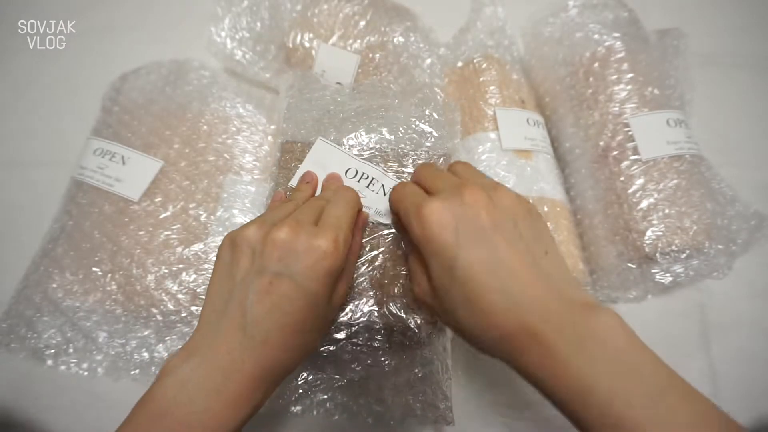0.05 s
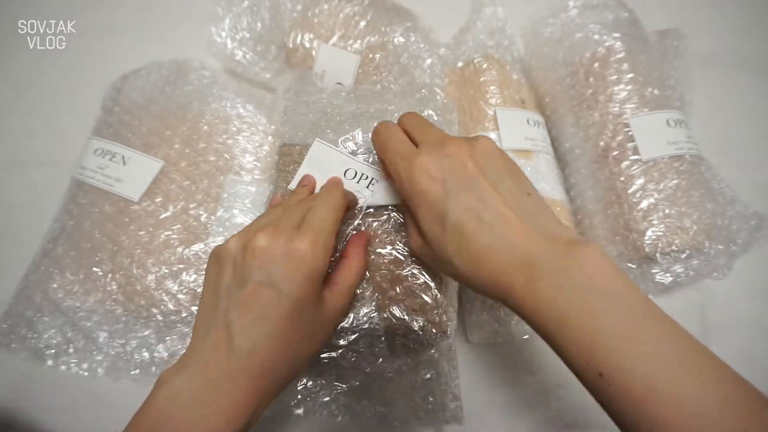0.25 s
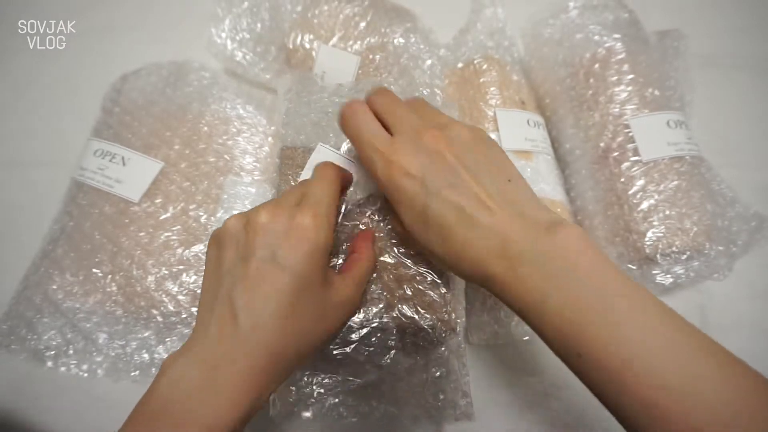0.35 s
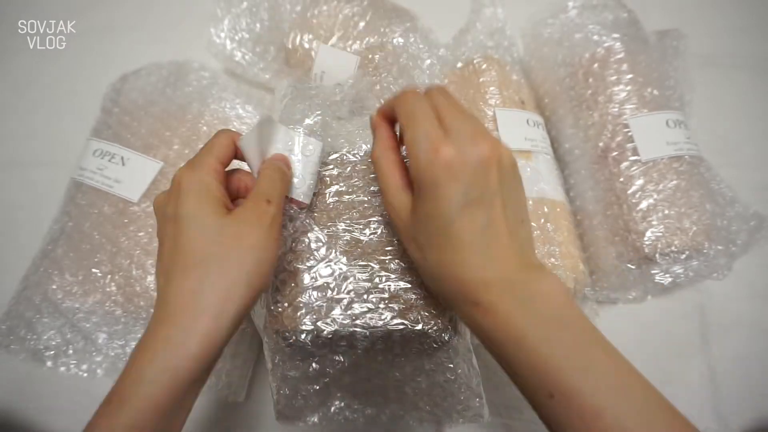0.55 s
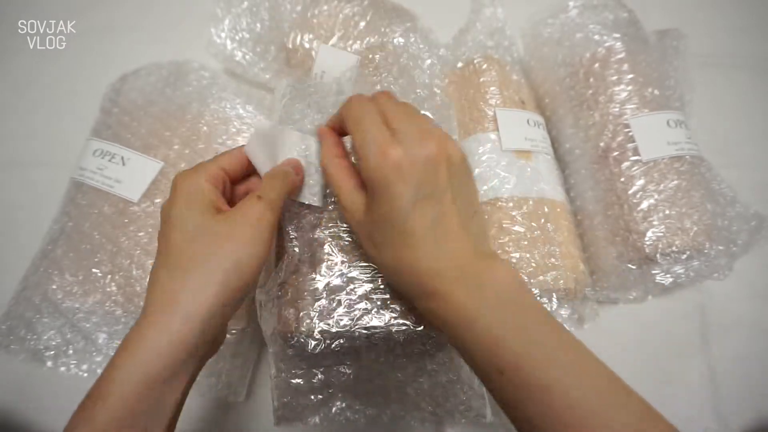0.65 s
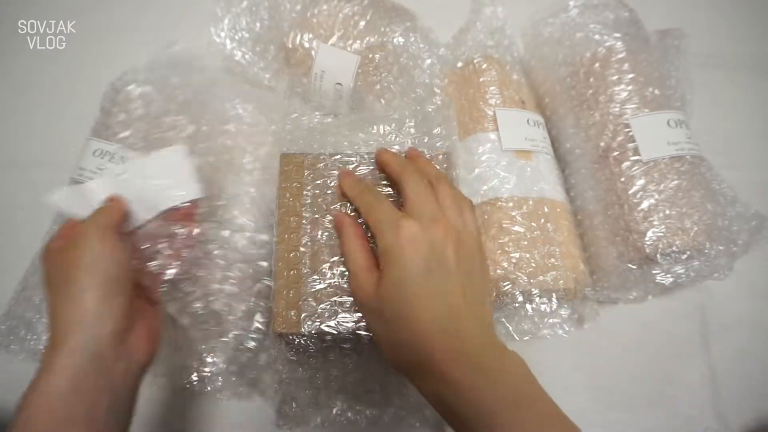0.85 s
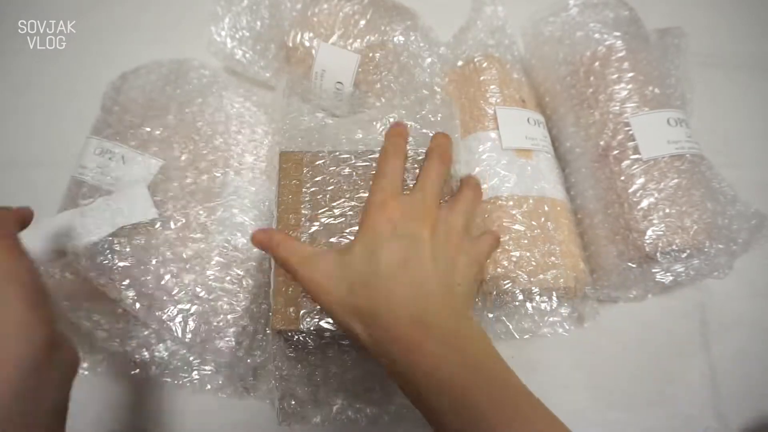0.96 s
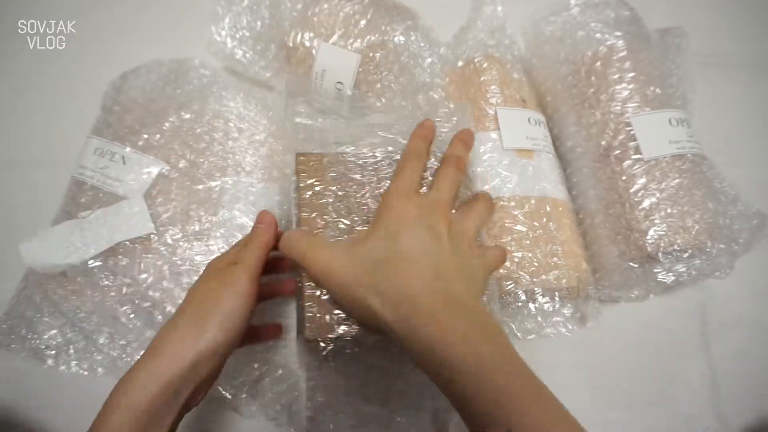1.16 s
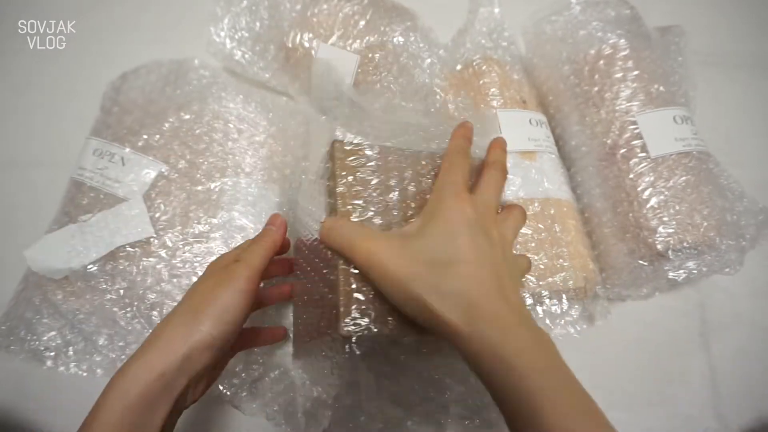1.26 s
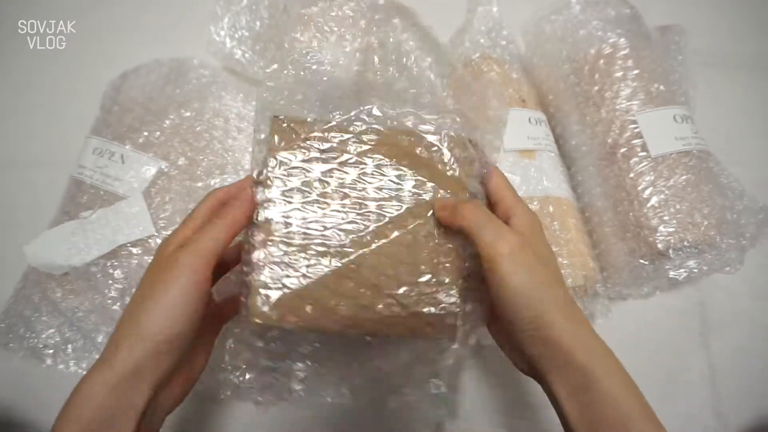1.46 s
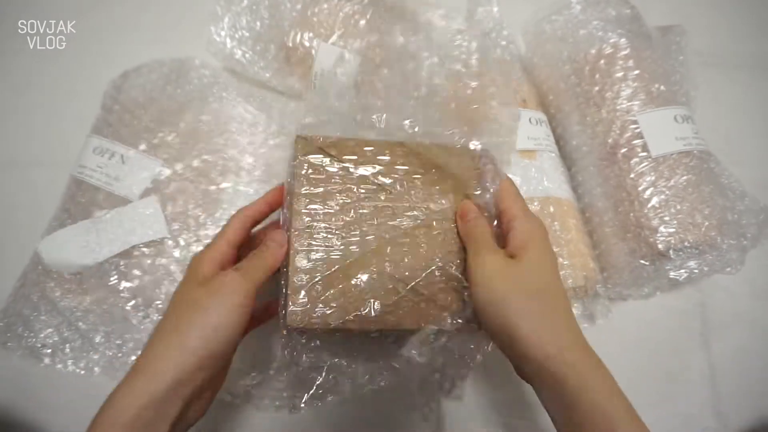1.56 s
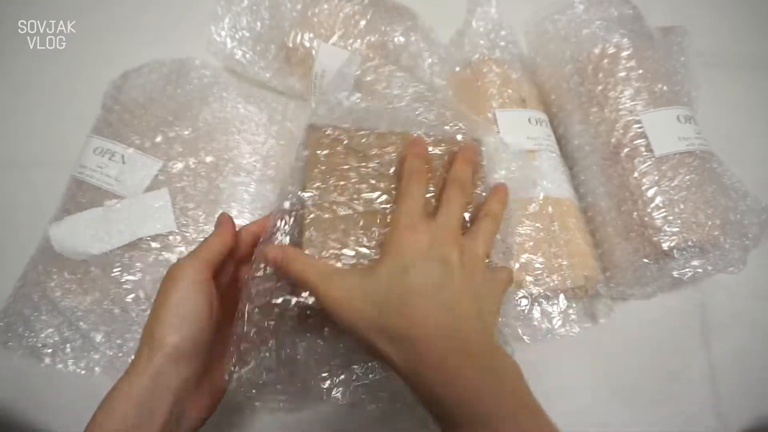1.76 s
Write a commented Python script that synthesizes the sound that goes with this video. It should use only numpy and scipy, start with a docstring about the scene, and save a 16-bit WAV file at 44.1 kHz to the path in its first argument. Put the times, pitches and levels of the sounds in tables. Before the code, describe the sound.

Bubble wrap crackles under the hands, close up in a small room. From about 0.2 seconds a sticky label lets go in sharp snaps, ending in a short rip near 0.4 seconds, the loudest moment. Softer, fizzy rustling follows as the wrap is unfolded. From 1.3 to 1.8 seconds the crinkling grows fuller, with small hollow pocks from the air cells as the box inside is lifted.

```python
"""At a table in a small room, hands rip a sticky label off a bubble-wrapped packet, then unfold the wrap
and lift the box inside. The glue lets go in sharp snaps and one short rip; the film rustles in countless
tiny buckles, and the air cells give hollow pocks under the fingers. The stereo microphone is close."""
import sys
import numpy as np
from scipy import signal
from scipy.fft import rfft, irfft
from scipy.io import wavfile
from scipy.ndimage import uniform_filter1d

SR = 44100
rng = np.random.default_rng(int(sys.argv[2]) if len(sys.argv) > 2 else 0)


def transcribe(signal):
    """Save signal, clipped to [-1, 1], as a 16-bit WAV file at the path in sys.argv[1]."""
    frames = np.atleast_2d(signal).T
    limited = np.clip(frames, -1, 1)
    pcm = np.round(limited * 32767).astype(np.int16)
    wavfile.write(sys.argv[1], SR, pcm)


N = 79380


def amp(db):
    """Decibels to gain."""
    return 10 ** (np.asarray(db) / 20)


def unit_rms(x):
    """Scales to rms 1."""
    return x / np.sqrt(np.mean(x ** 2) + 1e-20)


def read(points, hz):
    """Reads a curve on a log-frequency axis."""
    f, value = np.transpose(points)
    return np.interp(np.log(hz + 1), np.log(f), value)


def add(mix, start, sound):
    """Mixes a stereo sound in at a time in seconds."""
    part = mix[:, max(round(start * SR), 0):][:, :sound.shape[1]]
    part += sound[:, :part.shape[1]]


def panned(x, pan_db):
    """Constant-power pan; positive is left."""
    left = amp(pan_db)
    return np.array([x * left, x]) * np.sqrt(2 / (1 + left ** 2))


def click(colour, tilt=0, size=2048):
    """The shortest causal click with this spectrum and energy 1; tilt slopes the treble in dB/octave."""
    hz = abs(np.fft.fftfreq(size, 1 / SR))
    octaves = np.log2(np.clip(hz, 2600, 13000) / 6000)
    log_gain = np.log(amp(read(colour, hz) + tilt * octaves))
    wave = np.fft.ifft(np.exp(np.conj(signal.hilbert(log_gain)))).real
    return wave / np.linalg.norm(wave)


def crackle(curve, colour, per_s, spread_db):
    """A swarm of tiny clicks of uneven size, scattered over the film, riding a level curve."""
    hits = rng.random(N) < per_s / SR
    sizes = amp(spread_db * np.minimum(rng.exponential(1, N), 4)) * rng.choice([-1, 1], N)
    envelope = amp(np.interp(np.arange(N) / SR, *np.transpose(curve), left=-120))
    pan_db = -2.5 + 7.5 * rng.standard_normal(N)
    train = panned(unit_rms(hits * sizes) * envelope, pan_db)
    return signal.fftconvolve(train, click(colour)[None])[:, :N]


def room_tone():
    """A faint, steady bed of noise."""
    # room tone spectrum: f/Hz, level/dB
    colour = [(30, -38), (110, -26), (220, -19.5), (330, -16), (450, 12.5), (1000, -10), (4000, -6),
              (16000, -3.5)]
    return signal.fftconvolve(rng.standard_normal(N), click(colour))[:N]


def room(x):
    """A small room: a short, dense tail, more alike left and right in the bass than in the top end."""
    # reverb time: f/Hz, t60/s
    t60 = [(200, 0.19), (1000, 0.22), (4000, 0.21), (9000, 0.19), (16000, 0.23)]
    # left-right likeness of the tail: f/Hz, correlation
    likeness = [(200, 0.83), (1000, 0.62), (2500, 1), (5000, 0.32), (16000, 0.28)]
    onset_s = .00067
    hz, t, (left, other) = signal.stft(rng.standard_normal((2, SR // 2)), SR, nperseg=256)
    same = np.clip(read(likeness, hz), 0, 1)[:, None]
    right = same * left + np.sqrt(1 - same ** 2) * other
    decay = np.exp(-np.log(1000) * t / read(t60, hz)[:, None])
    tail = signal.istft(np.array([left, right]) * decay, SR)[1]
    tail *= np.clip(np.arange(tail.shape[1]) / SR / onset_s - .5, 0, 1)
    return signal.fftconvolve(x, tail / np.linalg.norm(tail[0]), axes=1)[:, :N]


def table_scatter(x):
    """The table and the packets around smear every crack over a few milliseconds."""
    decay_s = .0039
    t = np.arange(1500) / SR
    taps = rng.standard_normal((2, len(t))) * np.sqrt(t) * np.exp(-t / decay_s)
    taps += taps.mean(0)  # pulls the reflections toward the centre
    return signal.fftconvolve(x, taps / np.linalg.norm(taps[0]), axes=1)[:, :N]


def drifting(reflect, x, count=3, swells_per_s=6.005):
    """The hands move, so their sound crossfades through several sets of reflections."""
    turn = swells_per_s * np.arange(N) / SR
    return sum(reflect(x * np.cos(np.pi * (turn + k / count))) for k in range(count)) * np.sqrt(2 / count)


def air_cell_pocks():
    """An air cell rings for a few uneven cycles; it is too small to radiate bass."""
    # cells pressed or knocked: t/s, level/dB, f/Hz
    pocks = [(.004, -41, 896), (.062, -48, 910), (.112, -41, 975), (.235, -43.5, 950), (.243, -43, 1040),
             (.286, -45.5, 1010), (.427, -32.5, 1096), (.473, -38.5, 1460), (0.9252, -50, 1460),
             (.956, -46.5, 830), (1.117, -43.5, 1240), (1.2925, -40, 1290), (1.31, -40, 1180),
             (1.3483, -33.5, 1200), (1.423, -38, 1350), (1.536, -38, 1130), (1.5465, -29.5, 880),
             (1.589, -34.5, 1000), (1.752, -45, 778)]
    decay_s, pitch_jitter, low_cut_hz = .00055, .18, 560
    out, t = np.zeros((2, N)), np.arange(1500) / SR
    envelope = (t / decay_s) ** 2 * np.exp(-t / decay_s)
    envelope /= envelope.max()
    for (start, db, hz), noise in zip(pocks, rng.standard_normal((len(pocks), len(t)))):
        wobble = pitch_jitter * unit_rms(uniform_filter1d(noise, size=16))
        cycles = np.cumsum(hz * (1 + wobble)) / SR
        add(out, start, panned(amp(db) * envelope * np.sin(2 * np.pi * cycles), 0))
    return signal.sosfilt(signal.butter(3, low_cut_hz, "high", fs=SR, output="sos"), out)


def wrap_rustle():
    """The film fizzes and crinkles while the air cells rub on fingers and box."""
    # handling envelopes: t/s, fizz level/dB, crinkle level/dB, rub level/dB
    handling = [(0, -46.5, -58, -47.5), (.12, -49, -55.5, -56.5), (.2, -47.5, -61.5, -63.5),
                (.34, -54, -77, -66), (.44, -96, -94, -56), (0.518, -48, -49.5, -60.5),
                (0.566, -54.5, -69.5, -74), (.6, -52.5, -46, -57.5), (0.614, -57, -68, -76),
                (.648, -62.5, -57, -80), (0.676, -62, -67, -72.5), (0.711, -64, -62.5, -73.5),
                (0.733, -52.5, -60, -80), (.773, -52, -62, -74), (0.78, -44.5, -70, -71),
                (.81, -50.5, -56, -67), (0.844, -47, -58.5, -79.5), (.87, -58.5, -60.5, -67),
                (0.896, -47.5, -55, -71), (.915, -53.5, -59, -71), (0.959, -48, -51.5, -66),
                (.985, -54.5, -62, -66.5), (1.028, -52, -58, -62.5), (1.051, -64, -64, -71.5),
                (1.1, -58.5, -63.5, -72.5), (1.171, -58, -59, -66), (1.188, -52.5, -54.5, -65.5),
                (1.286, -55, -57.5, -67), (1.294, -50, -40.5, -79), (1.302, -43.5, -58, -58.5),
                (1.313, -49.5, -50, -62), (1.38, -53.5, -56.5, -99), (1.411, -46.5, -58, -69),
                (1.426, -46, -47, -59), (1.45, -42.5, -51, -58), (1.505, -40.5, -45.5, -54.5),
                (1.524, -41, -42.5, -51.5), (1.547, -47.5, -42.5, -56), (1.564, -44, -47, -67.5),
                (1.629, -43, -47, -57.5), (1.721, -53, -53.5, -63.5), (1.771, -41, -46.5, -54.5),
                (1.8, -48.5, -52, -66)]
    # treble fizz of the film: f/Hz, level/dB
    fizz_colour = [(30, -69), (1500, -23.5), (3500, -9), (5500, 3), (8000, -0.5), (11000, -2),
                   (16000, -6.5)]
    # upper-mid crinkle of the film: f/Hz, level/dB
    crinkle_colour = [(30, -54.5), (600, -39.5), (1400, -5.5), (2100, -2), (2850, 2.5), (3400, 0.5),
                      (4200, -5), (6000, -23), (16000, -12)]
    # hollow rub of the cells: f/Hz, level/dB
    rub_colour = [(30, -50.5), (250, -42.5), (450, -24.5), (650, -14.5), (850, -0.5), (1000, -1),
                  (1200, 3.5), (1500, -18), (4000, -21.5), (16000, -41.5)]
    t, fizz_db, crinkle_db, rub_db = np.transpose(handling)
    fizz = crackle(np.c_[t, fizz_db], fizz_colour, per_s=5500, spread_db=3.8)
    crinkle = crackle(np.c_[t, crinkle_db], crinkle_colour, per_s=3000, spread_db=-.5)
    rub = crackle(np.c_[t, rub_db], rub_colour, per_s=1200, spread_db=2)
    return fizz + crinkle + rub.mean(0)


def label_rip():
    """The glue gives way in a fast run of small snaps."""
    # envelope of the label ripping free: t/s, level/dB
    curve = [(.353, -28), (.358, -29.5), (.371, -45), (.38, -28), (.393, -29), (.399, -26.5), (.412, -23.5),
             (.422, -38.5), (.431, -27.5), (.439, -45), (.45, -60)]
    # rip spectrum: f/Hz, level/dB
    colour = [(30, -69), (300, -55), (550, -29.5), (900, -0.5), (1150, -8.5), (1700, -9), (3400, 1.5),
              (4500, -0.5), (7400, 9), (11000, -2), (16000, -11)]
    gate = np.arange(N) / SR < curve[-1][0]
    return crackle(curve, colour, per_s=3100, spread_db=3.5) * gate


def glue_snaps():
    """Each snap is a sharp crack, a burr of smaller cracks and a brief ring of its own patch of film."""
    # snaps of glue and film: t/s, level/dB, treble tilt/(dB/octave), pan left/dB
    snaps = [(0.1326, -36, 2.0, -1), (0.162, -44, 1.5, -3), (0.1789, -40, -1.5, -2), (0.2262, -32, -0.3, 0),
             (0.2333, -19, 0.6, -3), (0.234, -22, -1.1, -4), (0.2377, -24, -0.4, -4),
             (0.2415, -27, -1.4, -4), (0.2809, -25, -0.3, 0), (0.2851, -23, 1.4, -3),
             (0.3067, -30, 6.0, -4), (0.3117, -27, 6.0, -5), (0.321, -33, 6.0, -2), (0.3292, -29, 4.7, -3),
             (0.3525, -20, 2.7, -3), (0.3571, -21, 3.9, -3), (0.3791, -21, 2.1, -4), (0.3826, -26, 3.4, -4),
             (0.3851, -24, 2.4, -4), (0.389, -28, 2.8, -3), (0.3966, -23, -1.2, -4), (0.401, -25, 2.5, -5),
             (0.4074, -20, 2.9, -4), (0.4102, -22, 4.7, -5), (0.4122, -22, 4.5, -4), (0.4154, -23, 3.7, -4),
             (0.4178, -25, 2.5, -6), (0.4201, -23, 2.1, -4), (0.4245, -26, 0.6, -3), (0.4267, -25, 2.3, -3),
             (0.4304, -25, 4.5, -2), (0.4725, -41, -2.3, -1), (0.4922, -45, -2.7, -3),
             (0.5183, -44, 0.1, -2), (0.5797, -38, 3.5, -2), (0.5904, -40, 3.3, -1),
             (0.5969, -37, -1.9, -1), (0.6646, -43, 4.1, -2), (0.7268, -43, 0.7, -2),
             (0.7789, -41, 3.2, -1), (0.782, -41, 2.3, -1), (0.9239, -32, -1.4, 3), (0.9575, -33, -4.3, 2),
             (0.9615, -41, 2.0, -4), (1.1178, -41, -1.8, -7), (1.181, -44, -3.2, -4),
             (1.2402, -41, -5.0, -7), (1.2651, -47, -5.8, -2), (1.2919, -41, -4.6, -2),
             (1.2957, -37, -2.9, 0), (1.3509, -34, -2.3, -3), (1.3986, -40, 1.0, 0),
             (1.4239, -38, -4.1, -6), (1.4405, -32, 1.5, -6), (1.6777, -41, 3.4, -1),
             (1.7081, -41, -3.8, -4)]
    # snap spectrum: f/Hz, level/dB
    colour = [(30, -38.5), (90, -36), (300, -36), (550, -29.5), (700, -20.5), (1000, -7), (1800, -8.5),
              (2600, -3), (3500, 5.5), (4600, 2), (7500, 4), (11000, 2), (15000, -4), (17000, 1.5)]
    ring_centre_hz, ring_spread_oct, ring_s = 3270, .2, .00057
    out, t = np.zeros((2, N)), np.arange(512) / SR
    for (start, db, tilt, pan_db), noise in zip(snaps, rng.standard_normal((len(snaps), len(t)))):
        burr_s = .0005 * np.exp(-.1 * tilt)  # shorter after a bright snap
        burr = .45 * noise * np.exp(-t / burr_s)
        crack = np.convolve(np.where(t == 0, 1, burr), click(colour, tilt))
        ring_hz = ring_centre_hz * 2 ** (ring_spread_oct * noise[-1])
        ring = np.convolve(np.sin(2 * np.pi * ring_hz * t) * np.exp(-t / ring_s), click(colour))
        ring_db = -18.5 - 2.2 * tilt  # dull snaps are big buckles that ring the taut film
        snap = unit_rms(crack) + amp(ring_db) * unit_rms(ring)
        snap *= np.sqrt(.0015 * SR) / np.linalg.norm(snap)  # the energy of 1.5 ms at rms 1
        add(out, start, panned(snap * amp(db + .8), pan_db))
    return out


def scene():
    """The packet up front, its reflections behind, room tone underneath."""
    packet = glue_snaps() + air_cell_pocks() + amp(-2) * (label_rip() + wrap_rustle())
    bed = amp(-82) * room_tone()
    early = amp(-5.5) * drifting(table_scatter, packet)
    reverb = amp(-6.5) * drifting(room, packet)
    return packet + early + reverb + bed


def record(dry):
    """Closely spaced capsules narrow the image in the bass; the top rolls off at 16 kHz."""
    # stereo width: f/Hz, side level/dB
    width = [(500, -7), (1200, -1.5), (2500, 0.5), (5000, 1), (9000, 3), (13000, 4.5)]
    mid, side = dry.mean(0), (dry[0] - dry[1]) / 2
    side = irfft(rfft(side) * amp(read(width, np.fft.rfftfreq(N, 1 / SR))), N)
    high_cut = signal.firwin(255, 16000, window=("kaiser", 8), fs=SR)
    return signal.oaconvolve(np.array([mid + side, mid - side]), high_cut[None], "same")


dry = scene()
out = record(dry)
transcribe(out)
```